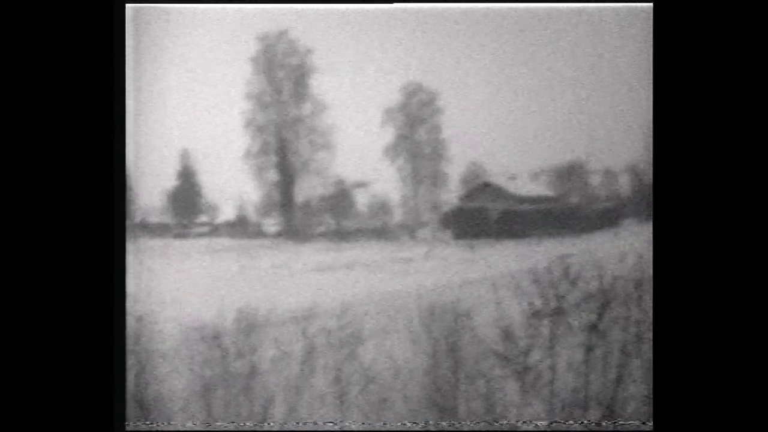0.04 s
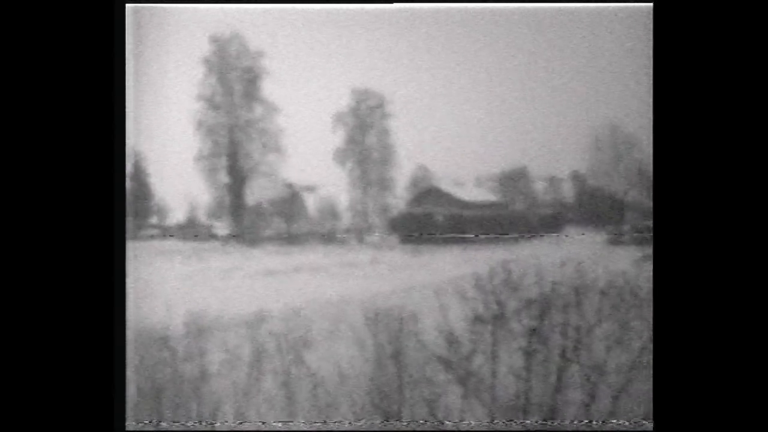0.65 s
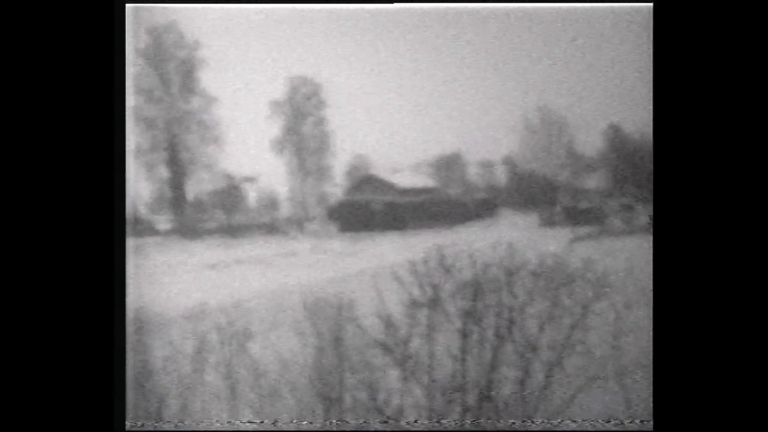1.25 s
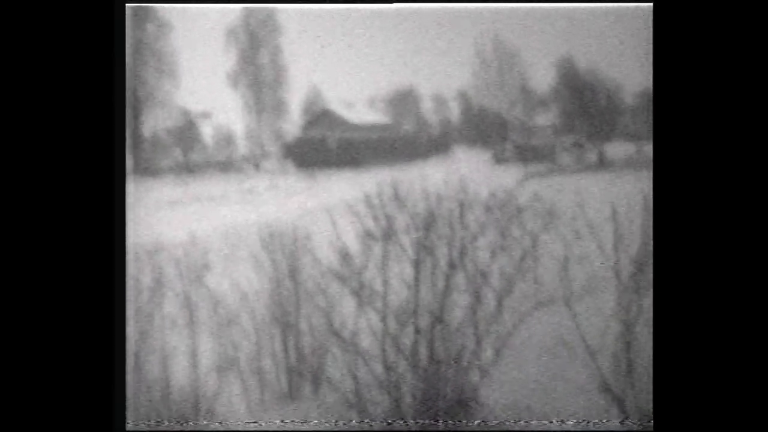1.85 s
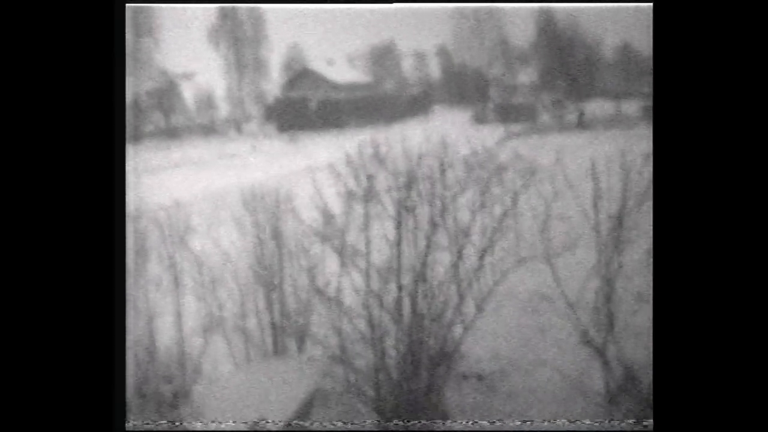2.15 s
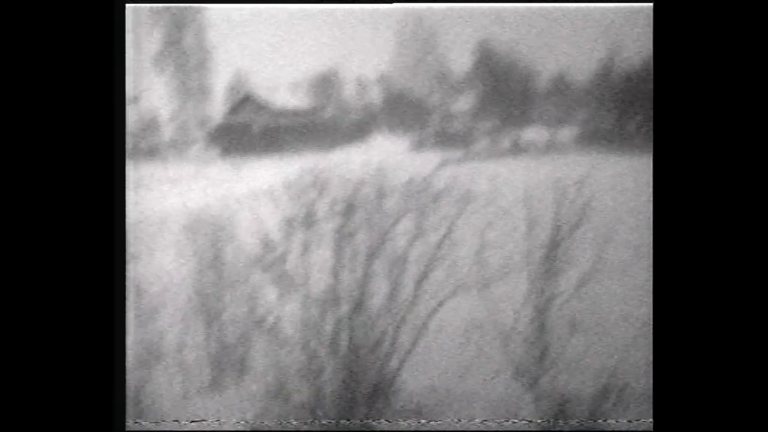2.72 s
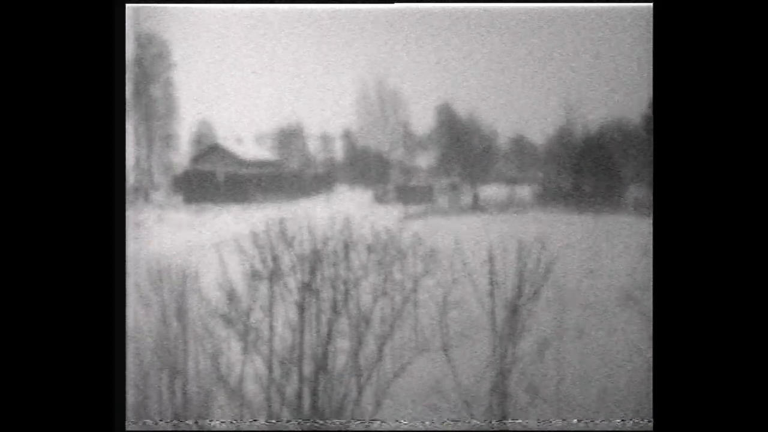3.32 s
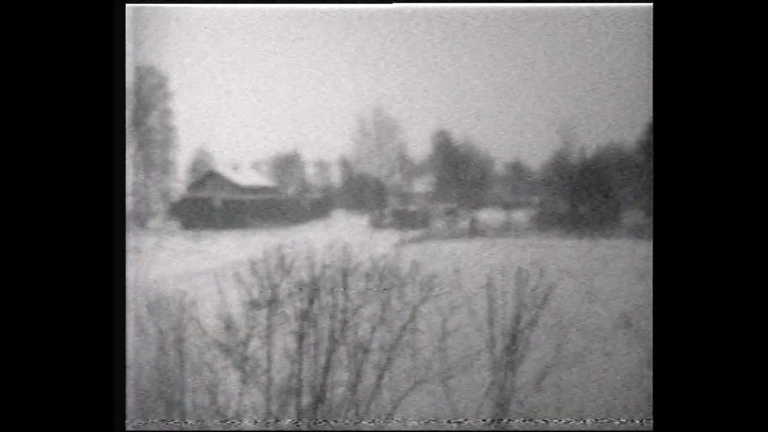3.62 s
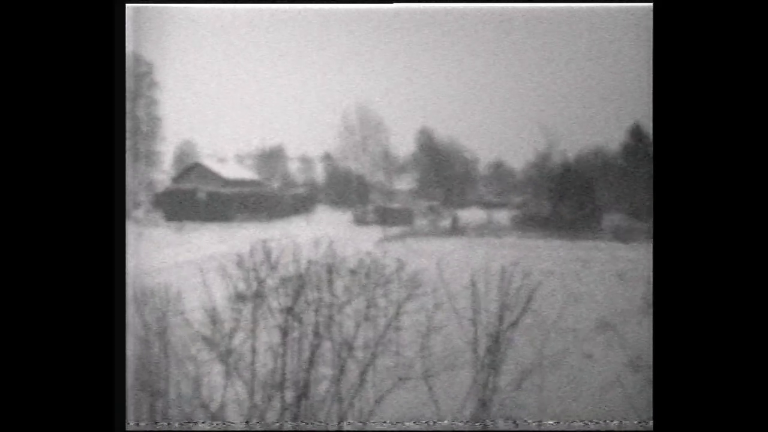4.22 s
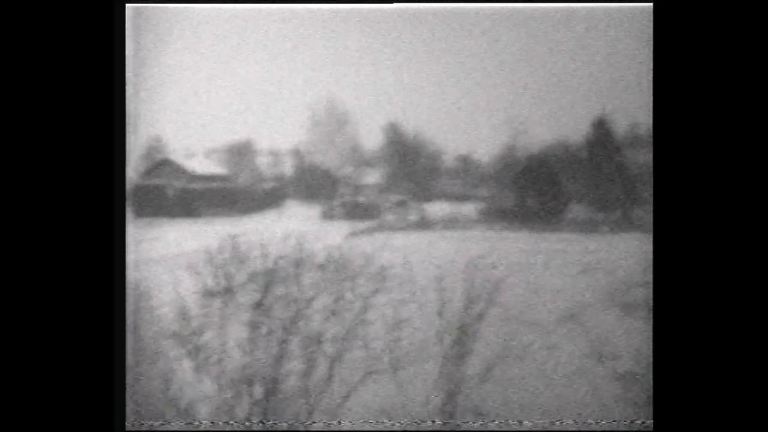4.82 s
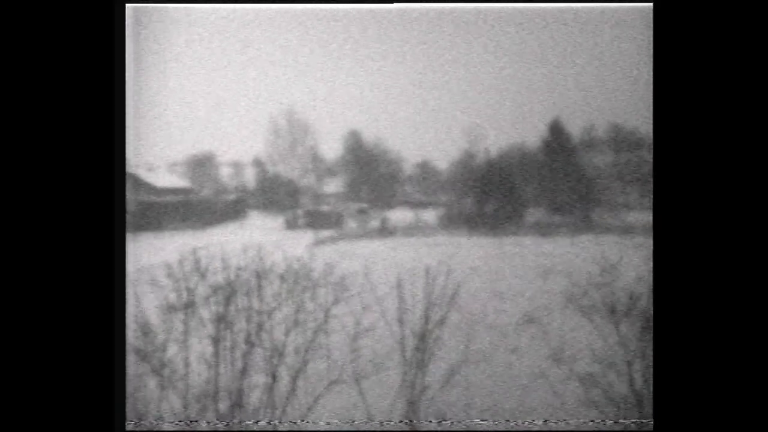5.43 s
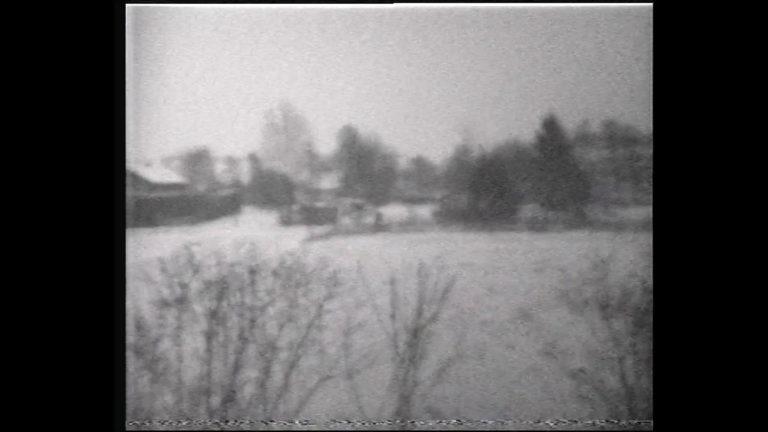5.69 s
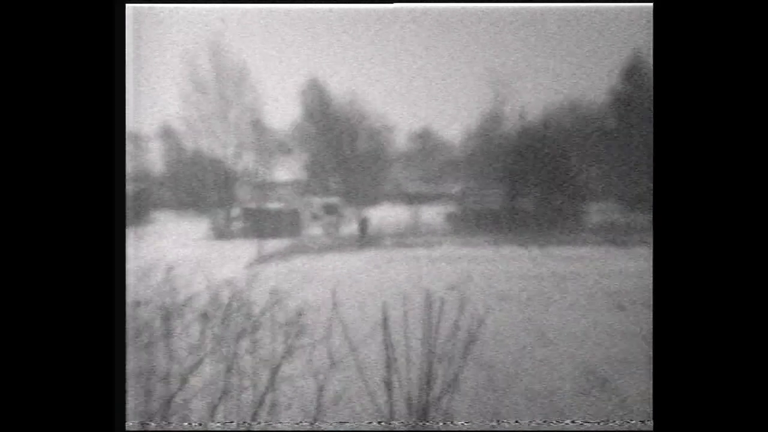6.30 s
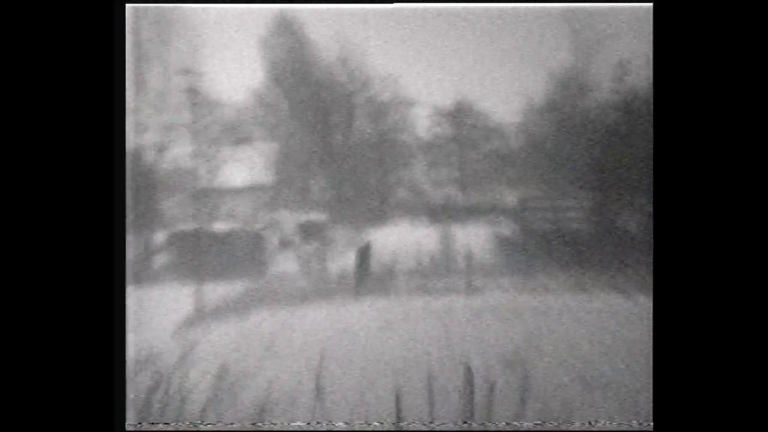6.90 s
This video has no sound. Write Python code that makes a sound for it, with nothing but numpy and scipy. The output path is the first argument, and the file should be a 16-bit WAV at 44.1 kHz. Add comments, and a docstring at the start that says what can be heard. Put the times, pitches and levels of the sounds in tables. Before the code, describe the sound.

A running video tape recorder makes a fast, even ticking buzz over tape hiss, low hum and a thin, very high whistle. One sharp plastic click comes early, and a faint motor whine creeps in about halfway. Later, fingers handle the camera case, giving a quick cluster of clicks, low thumps and rubbing, then another click and a soft bump. Everything sounds close and dry, as if through the camera's own microphone.

```python
"""A ticking buzz, 25 pulses a second, from a running home video tape recorder: crosstalk from the picture
signal into the sound track. Beneath it lie tape hiss, hum at harmonics of the frame rate and a thin
whistle at the line frequency. The plastic camera case is handled: impacts excite its modes as sharp clicks
and thumps, and fingers rub on it. Two faint squeaks pass, and a faint motor whine sets in halfway."""
import sys
import numpy as np
from scipy import signal
from scipy.fft import rfft, irfft, next_fast_len
from scipy.io import wavfile
from scipy.ndimage import map_coordinates

SR = 44100
rng = np.random.default_rng(int(sys.argv[2]) if len(sys.argv) > 2 else 0)


def store_pcm(level_fs):
    """Save levels as 16-bit WAV."""
    pcm = np.round(np.clip(level_fs, -1, 1) * 32767).astype(np.int16)
    wavfile.write(sys.argv[1], SR, np.atleast_2d(pcm).T)


N = 306495
T = np.arange(N) / SR
FRAME_S, FIRST_FRAME_S = .0400057, .02527  # period and onset of the picture frames


def amp(db):
    """Amplitude ratio of a level in decibels."""
    return 10 ** (np.asarray(db) / 20)


def unit(x):
    """Normalisation to rms 1."""
    return x / np.sqrt(np.mean(x ** 2) + 1e-20)


def gains(points, hz):
    """Magnitude response interpolated between (f/Hz, level/dB) points on a log frequency axis."""
    f, db = np.transpose(points)
    return amp(np.interp(np.log(hz + 1), np.log(f + 1), db))


def filtered(x, response):
    """Linear filtering: the spectrum of x times a frequency response."""
    size = next_fast_len(N + SR // 2)
    return irfft(rfft(x, size) * response(np.fft.rfftfreq(size, 1 / SR)), size)[:N]


def noise(points):
    """White noise shaped by a response of (f/Hz, level/dB) points."""
    return filtered(rng.standard_normal(N), lambda hz: gains(points, hz))


def wobble(rate):
    """Smooth random modulation: a spline through `rate` knots a second."""
    return map_coordinates(rng.standard_normal(int(N * rate / SR) + 4), [T * rate])


def lowpass(x, edge_hz, order=3):
    """Causal attenuation above a cutoff frequency."""
    return signal.sosfilt(signal.butter(order, min(edge_hz, SR / 2 - 1), fs=SR, output="sos"), x)


def add(track, s, sound):
    """Superposition of a sound on the track, starting at s seconds."""
    span = track[round(s * SR):][:len(sound)]
    span += sound[:len(span)]


def ticks(times, points, scatter_db, size=2048):
    """Pulse train: impulses of random strength excite a minimum-phase filter of the given spectrum."""
    cepstrum = irfft(np.log(gains(points, np.fft.rfftfreq(size, 1 / SR))))
    cepstrum[1:size // 2] *= 2  # folding onto positive time makes the pulse causal
    cepstrum[size // 2 + 1:] = 0
    pulse = irfft(np.exp(rfft(cepstrum)))
    strengths = amp(scatter_db * rng.standard_normal(len(times)))
    train = np.bincount((times * SR).astype(int) - 1, strengths, N)
    return signal.fftconvolve(train, pulse)[:N]


def ring(modes, t, scatter_db):
    """Free vibration: damped modes of alternating sign, their strengths varying from blow to blow."""
    return sum(amp(db + scatter_db * rng.standard_normal()) * (-1) ** k
               * np.exp(-np.log(1000) * t / t60) * np.sin(2 * np.pi * hz * t)
               for k, (hz, db, t60) in enumerate(modes))


def wide_hiss():
    """Decorrelation: a faint steady hiss, different left and right, slightly widens the sound."""
    # spectrum of the faint hiss (f/Hz, level/dB)
    spectrum = [(30, -57), (200, -55), (600, -54), (2000, -60.5), (4000, -61), (7000, -72), (10000, -87.5),
                (15500, -89)]
    return np.array([noise(spectrum), noise(spectrum)])


def tape_hiss():
    """Stationary broadband noise from the tape, strongest in the bass."""
    # noise spectrum of the tape (f/Hz, level/dB)
    spectrum = [(20, -41), (70, -38.5), (200, -34), (500, -39), (1000, -41.5), (2000, -45.5), (4000, -51),
                (7000, -56), (10000, -63), (13000, -62.5), (15500, -66)]
    return noise(spectrum)


def hum():
    """Harmonic series: the periodic scanning ramp hums at low multiples of the frame rate."""
    # partials of the ramp (harmonic number, peak level/dB)
    harmonics = [(1, -58), (2, -49), (3, -61), (4, -77), (6, -65.5), (8, -59.5)]
    phase = 2 * np.pi * ((T - FIRST_FRAME_S) / FRAME_S - .5)
    return -sum(amp(db) * np.sin(round(k) * phase) for k, db in harmonics)


def line_whistle(line_hz=15625, db=-56.0, flutter_hz=11):
    """Flutter: tape speed modulates the line tone in frequency, head contact in amplitude."""
    pitch = line_hz + flutter_hz * (wobble(12) + .8 * wobble(60))
    strength = 1 + .13 * wobble(25) + .12 * wobble(250)
    return amp(db) * unit(strength * np.sin(2 * np.pi * np.cumsum(pitch) / SR))


def motor_whine(pitch_hz=1652, waver_hz=6, db=-62.8, uneven_db=.7):
    """Amplitude modulation: the faint tone of a small motor comes up gradually and throbs slowly."""
    full_s, rise_db_per_s = 4.8, 9
    crest_s, period_s, throb_db = 4.95, .45, 3.5
    rise = rise_db_per_s * np.minimum(T - full_s, 0)
    throb = throb_db * np.cos(2 * np.pi * (T - crest_s) / period_s)
    level = db + rise + throb + uneven_db * wobble(7.7)
    pitch = pitch_hz + waver_hz * wobble(40)
    return amp(level) * unit(np.sin(2 * np.pi * np.cumsum(pitch) / SR))


def squeaks(rough_hz=130):
    """Fast random frequency modulation roughens thin tones that swell and fade as they glide down."""
    # falling tones (t/s, level/dB, duration/s, start f/Hz, end f/Hz)
    glides = [(1.047, -55, 0.078, 4900, 2620), (4.019, -53, .045, 4500, 3180)]
    track = np.zeros(N)
    for s, db, length, start_hz, end_hz in glides:
        glide = np.geomspace(start_hz, end_hz, int(length * SR))
        pitch = glide + rough_hz * wobble(920)[:len(glide)]
        swell = signal.windows.tukey(len(pitch), .5)
        add(track, s, amp(db) * swell * np.sin(2 * np.pi * np.cumsum(pitch) / SR))
    return track


def rubbing(low_hz, edge_hz, order=3):
    """Friction noise of skin sliding on plastic, band-limited and at rms 1."""
    # friction spectrum (f/Hz, level/dB)
    spectrum = [(30, -12), (80, 4), (200, 2), (600, -6), (1500, -6.5), (5000, -12)]
    friction = lowpass(noise(spectrum), edge_hz, order=3)
    return unit(filtered(friction, lambda hz: hz ** order / np.hypot(hz ** order, low_hz ** order)))


def brushes(spread=1.32):
    """Sliding friction: fingers graze the case, each stroke a bell-shaped swell of band noise."""
    # finger strokes (crest t/s, level/dB, standard deviation of the swell/s, centre f/Hz)
    strokes = [(0.99, -47.5, 0.0084, 520), (1.545, -39.5, 0.0057, 540), (1.842, -45, 0.0044, 1400),
               (4.197, -50, .022, 238), (5.334, -41, .003, 1200), (5.3795, -29.5, .0016, 990),
               (5.438, -38, .011, 1000), (5.751, -36, .004, 700), (6.466, -34, 0.0052, 540),
               (6.643, -53, .012, 5600)]
    track = np.zeros(N)
    for s, db, width, centre_hz in strokes:
        swell = np.exp(-.5 * ((T - s) / width) ** 2)
        track += amp(db) * swell * rubbing(centre_hz / spread, centre_hz * spread, order=4)
    return track


def grip(start_s=5.406, attack_s=.022, hold_s=.085, release_s=.055):
    """Friction follows a power of pressure: as the hand lets go, the scrape dies before the rumble."""
    # rumble and scrape (rms level/dB at full pressure, lower f/Hz, upper f/Hz, pressure exponent)
    bands = [(-36, 85, 230, .8), (-35, 200, 660, 2.5)]
    age = T - start_s
    release = np.exp(-np.maximum(age - attack_s - hold_s, 0) / release_s)
    pressure = np.clip(age / attack_s, 0, 1) * release
    return sum(amp(db) * pressure ** power * rubbing(low_hz, edge_hz)
               for db, low_hz, edge_hz, power in bands)


def thumps():
    """Soft impacts excite the low resonances of the camera body."""
    # modes of the body (f/Hz, level/dB, T60/s)
    body_modes = [(89, -14, .08), (140, 1.5, 0.07), (229, -5, 0.069), (322, -4, 0.043), (537, -1.5, 0.032),
                  (776, 3, 0.023)]
    # soft knocks (t/s, level/dB, cutoff f/Hz)
    knocks = [(5.4244, -25, 900), (5.4430, -32, 1200), (5.4517, -22, 600), (5.4950, -33, 600),
              (6.4510, -37, 300), (6.4650, -29.5, 175)]
    track, t = np.zeros(N), T[:SR // 4]
    for s, db, edge_hz in knocks:
        add(track, s, amp(db) * lowpass(ring(body_modes, t, scatter_db=4), edge_hz))
    return track


def clicks(snap_db=-3.2, snap_s=.002, tail_db=-25.0, tail_s=.02, part_t60=.007, low_tail_hz=2200):
    """Hard impacts snap and excite modes of the case and the struck part; each rebounds once, duller."""
    # modes of the plastic case (f/Hz, level/dB, T60/s)
    case_modes = [(139, -15, 0.023), (260, -14, 0.045), (399, -17.5, 0.066), (566, -17, 0.046),
                  (965, -14, 0.039), (1504, -7.5, 0.04), (1626, -14, 0.034), (2110, -5.5, 0.017),
                  (2380, -3.5, 0.023), (3320, -2, 0.018), (4250, -5, 0.011), (5590, -3.5, 0.012),
                  (5990, -3.5, 0.0081), (7100, -6.5, 0.014), (8170, -7.5, 0.011), (9130, -7, 0.0068)]
    # spectrum of the contact transient (f/Hz, level/dB)
    snap_spectrum = [(100, 5), (1500, 4.5), (4000, 3.5), (7000, 3), (9500, -2.5), (11000, -13),
                     (15500, -22)]
    # impacts (t/s, level/dB, cutoff f/Hz, relative case level/dB, part f/Hz, relative part level/dB)
    impacts = [(1.9165, -12, 15500, 0, 5840, -12), (5.3824, -17, 9700, -7, 3690, 3),
               (5.4548, -19, 4400, -7, 1640, -12), (5.756, -19, 8500, -6.5, 6600, -3.5)]
    bounce_s, bounce_db, bounce_edge_ratio = .0031, -13, .4
    track, t = np.zeros(N), T[:SR // 6]
    snap_decay = np.exp(-t / snap_s)
    envelope = amp(snap_db) * snap_decay + amp(tail_db) * np.exp(-t / tail_s)
    low_envelope = amp(tail_db + 5.5) * np.exp(-t / (1.5 * tail_s))  # the lows last longer
    for s, db, edge_hz, case_db, part_hz, part_db in impacts:
        snap = noise(snap_spectrum)[:len(t)] * envelope
        low_tail = lowpass(rng.standard_normal(len(t)), low_tail_hz) * low_envelope
        case = amp(case_db) * ring(case_modes, t, scatter_db=.5)
        part = ring([(part_hz, part_db, part_t60)], t, scatter_db=4)
        add(track, s, amp(db) * lowpass(snap + case + part + low_tail, edge_hz))
        bounce = noise(snap_spectrum)[:len(t)] * snap_decay
        add(track, s + bounce_s, amp(db + bounce_db) * lowpass(bounce, bounce_edge_ratio * edge_hz))
    return track


def buzz(thin_from_s=3.0, thin_to_s=3.2):
    """Picture crosstalk: a strong tick each frame, briefly turning thin, and a weak tick between."""
    # spectra of the frame pulse, its thin form and the field pulse between frames (f/Hz, level/dB)
    frame_tick = [(30, -10), (300, -4.5), (1200, -5), (2500, -7), (5000, -11.5), (7500, -17.5),
                  (10000, -22), (12500, -28), (15500, -54)]
    thin_tick = [(100, -30), (1500, -29), (4500, -21), (10000, -23), (15500, -30)]
    field_tick = [(100, -42), (2000, -25), (5500, -25.5), (8000, -32), (11000, -46), (15000, -38)]
    frames = np.arange(FIRST_FRAME_S, N / SR, FRAME_S)
    is_thin = (frames > thin_from_s) & (frames < thin_to_s)
    strong = ticks(frames[~is_thin], frame_tick, scatter_db=.27)
    thin = ticks(frames[is_thin], thin_tick, scatter_db=.5)
    return strong + thin + ticks(frames + FRAME_S / 2, field_tick, scatter_db=1.5)


def scene():
    """Superposition: one mono sum feeds both channels, the right a little stronger."""
    # channel imbalance (f/Hz, level/dB added on the right and subtracted on the left)
    imbalance = [(100, .99), (400, 1.05), (1500, .88), (8000, .21), (15000, .81)]
    machine = buzz() + hum() + tape_hiss() + line_whistle() + motor_whine()
    mono = machine + clicks() + thumps() + brushes() + grip() + squeaks()
    left = filtered(mono, lambda hz: 1 / gains(imbalance, hz))
    right = filtered(mono, lambda hz: gains(imbalance, hz))
    return np.array([left, right]) + wide_hiss()


def record(dry):
    """Saturation and band limiting: the tape rounds the highest peaks and cuts the top of the treble."""
    ceiling, band_limit_hz = .62, 16100
    rounded = dry / np.sqrt(np.hypot(1, (dry / ceiling) ** 2))
    return np.array([filtered(channel, lambda hz: hz < band_limit_hz) for channel in rounded])


dry = scene()
out = record(dry)
store_pcm(out)
```